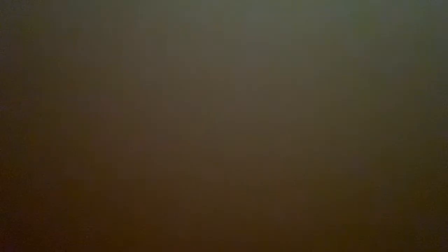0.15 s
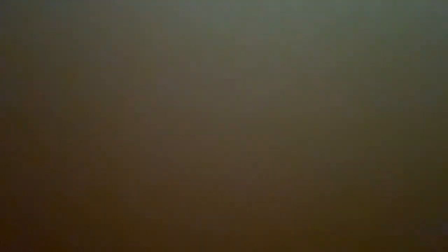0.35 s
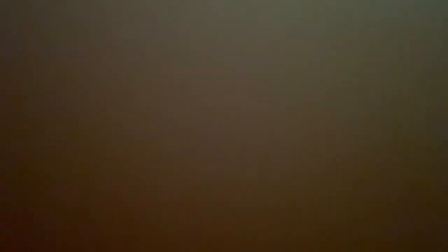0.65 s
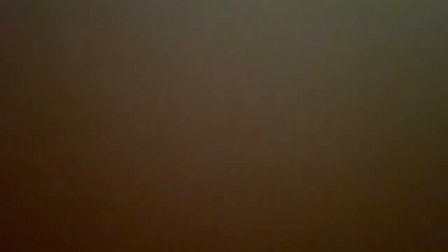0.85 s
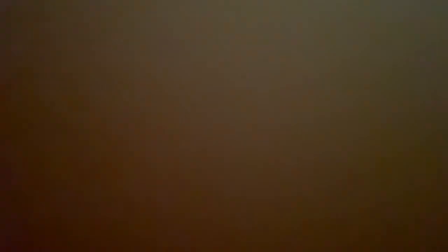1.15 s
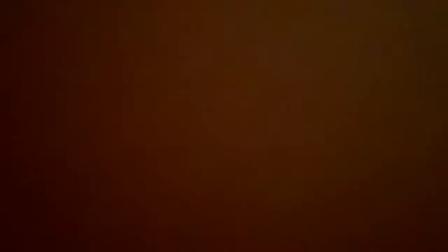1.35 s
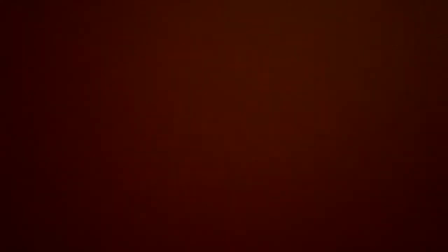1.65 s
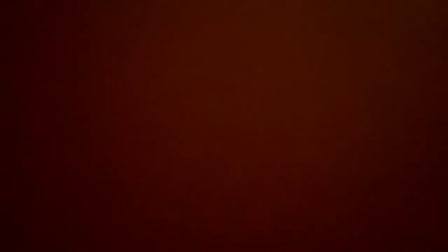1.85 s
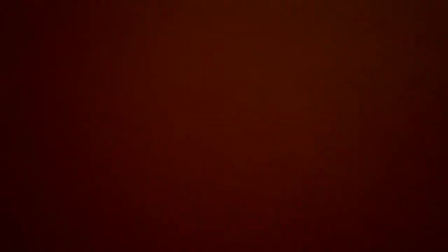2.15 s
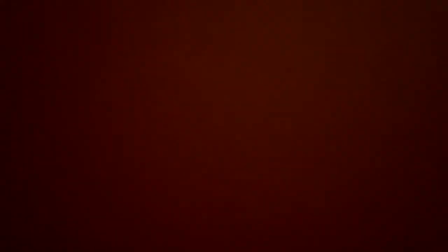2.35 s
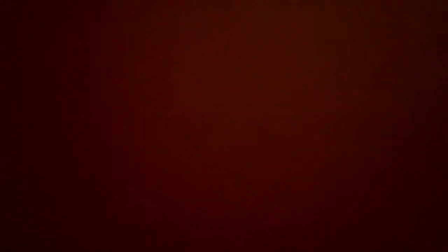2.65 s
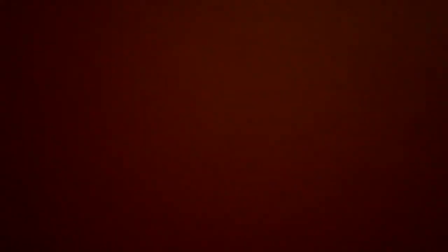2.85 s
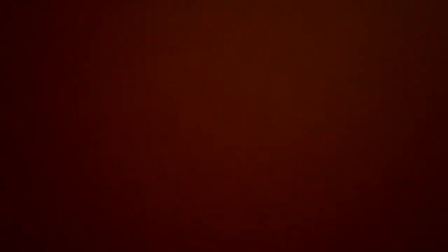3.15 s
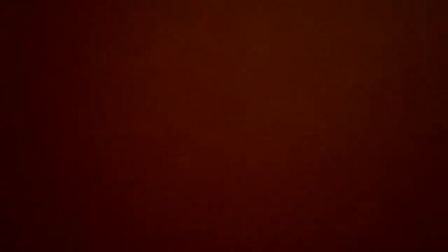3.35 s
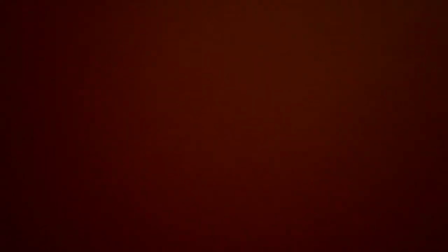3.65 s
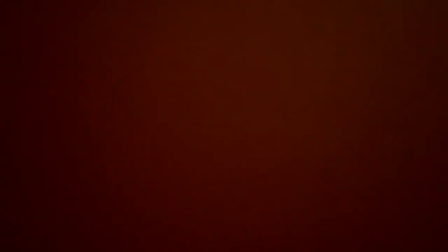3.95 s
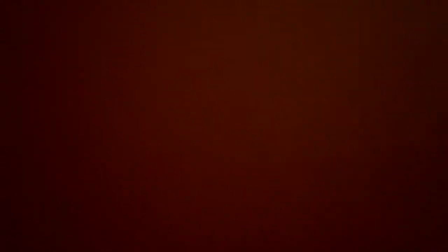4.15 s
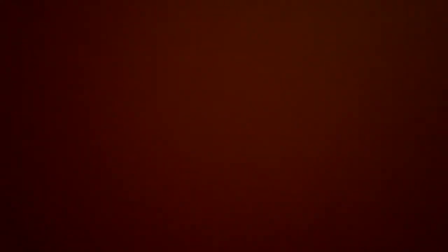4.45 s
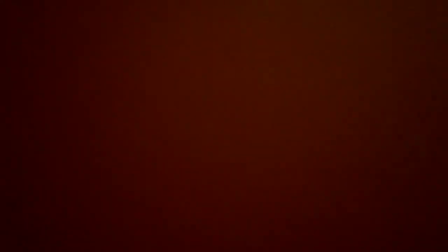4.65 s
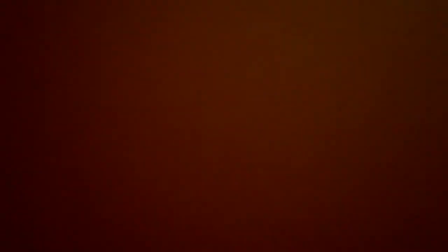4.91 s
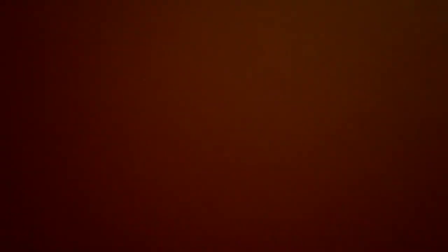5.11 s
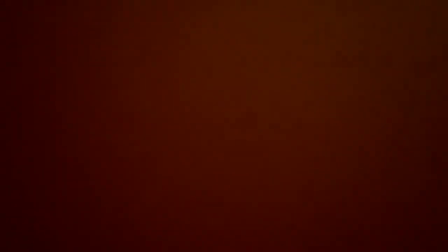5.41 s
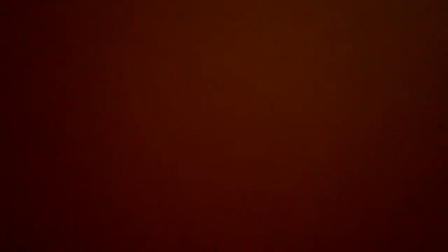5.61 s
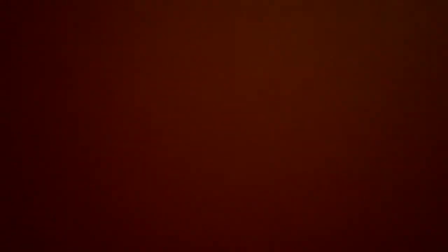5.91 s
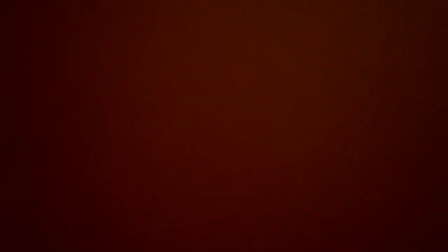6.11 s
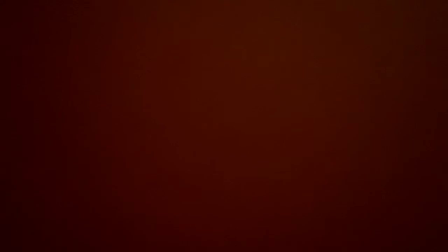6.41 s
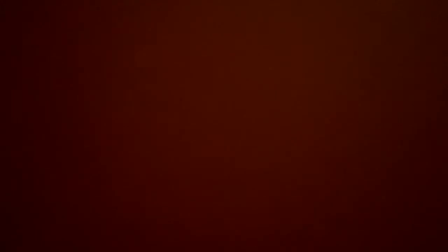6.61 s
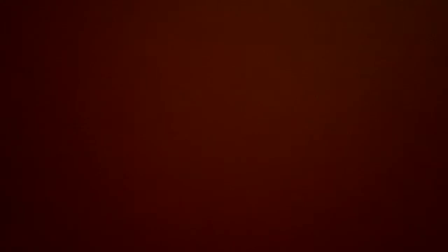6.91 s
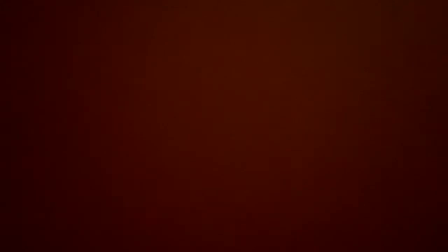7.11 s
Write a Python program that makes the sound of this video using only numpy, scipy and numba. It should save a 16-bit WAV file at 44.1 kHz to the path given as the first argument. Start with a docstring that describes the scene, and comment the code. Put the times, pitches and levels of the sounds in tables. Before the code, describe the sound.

Plastic toy bricks rattle and clack as they drop into a hollow bin, with dull thuds, loose settling pieces and brief pauses.

```python
"""Plastic bricks dropped into a bin

Handfuls of hollow plastic bricks are scooped up and dropped into a plastic bin; a phone lies right beside it.
Each knock is a quick burst of tiny contacts that makes the hollow brick ring and its edges tick.
Landings thump the floor and wall of the bin, and small pieces rattle and settle in between.
The bin and a small furnished room add short echoes over a faint, steady room tone.
"""
import sys
import numpy as np
from scipy import signal
from scipy.fft import rfft, irfft, next_fast_len
from scipy.io import wavfile
from numba import njit

SR = 44100
rng = np.random.default_rng(int(sys.argv[2]) if len(sys.argv) > 2 else 0)


def persist_wave(psi):
    """Save psi, clipped to +-1, as 16-bit WAV."""
    counts = np.round(np.clip(psi, -1, 1) * 32767).astype(np.int16)
    wavfile.write(sys.argv[1], SR, np.atleast_2d(counts).T)


N = 320607
CORNERS = 4  # corners of the bin where a blow can land

# Brick knocks: (time [s], peak level [dB], brick pitch [Hz], edge tick above the peak [dB], contact [ms])
KNOCK_EVENTS = [(0.023, -18.5, 2260, 9.5, 7.1), (0.038, -22, 2270, -12.5, 6), (0.06, -17.5, 2550, 6, 1.1),
                (0.0903, -20, 3000, 3, 2.4), (0.1084, -19.5, 2500, 0, 1.6), (0.1385, -23, 2400, -13, 5.5),
                (0.191, -17, 2300, -19, 2.7), (0.1978, -18.5, 2740, 2, 2.2), (0.242, -14.5, 2200, 13, 7.8),
                (0.271, -18.5, 2380, 8, 2.6), (0.328, -17, 2600, 5, 6.6), (0.3649, -22.5, 3090, 11, 4),
                (0.421, -28.5, 2420, -13.5, 5.7), (0.895, -34.5, 2100, 8, 3.2),
                (0.925, -28, 2860, -16, 1.7), (0.966, -17.5, 3030, -3, 2.3), (0.974, -15, 2240, -2.5, 10),
                (1.0171, -14.5, 1700, -2, 1.1), (1.091, -14.5, 2580, -5, 8.6),
                (1.105, -13.5, 2200, -12, 8.5), (1.118, -17, 2130, -13, 8.7),
                (1.186, -10.5, 2090, -22, 6.7), (1.185, -10.5, 5400, -26, 2.1),
                (1.2402, -20.5, 1370, -31, 1.2), (1.277, -20, 2040, -17.5, 15),
                (1.324, -15.5, 1620, -15, 1.3), (1.444, -25, 2200, -12, 3.5),
                (1.4771, -22.5, 3240, -25, 1.7), (1.5268, -11.5, 2070, -7, 2.9),
                (1.599, -19.5, 2000, -15, 1.6), (1.6776, -20, 3040, -2.5, 15),
                (1.6918, -19, 2700, -22.5, 1.1), (1.702, -26, 2280, -15, 1.7),
                (1.7286, -11, 1740, -20, 4.1), (1.737, -14, 1770, -21, 0.5), (1.738, -16.5, 3180, -21, 4.4),
                (1.7733, -24.5, 2950, 3.5, 1.1), (1.7883, -21, 1800, 1, 2.5), (1.851, -25, 5140, -3, 1.5),
                (1.8686, -7, 2340, -27, 1.3), (1.885, -14.5, 2480, -12, 1.5),
                (1.8941, -15, 1890, 0.5, 0.96), (1.9211, -18, 3070, -11, 0.95),
                (1.957, -29.5, 3960, 0.5, 1.9), (2.0063, -20, 2140, 4, 1.0), (2.013, -21.5, 4400, -3, 0.93),
                (2.033, -24.5, 1900, 0, 1), (2.049, -25, 1930, -5, 1.6), (2.07, -27.5, 1710, -10, 1.5),
                (2.1443, -10, 2550, -1, 2.5), (2.147, -14, 1540, -16, 3.4), (2.178, -10.5, 2740, -17.5, 6),
                (2.1828, -12.5, 2720, -0.5, 4.5), (2.195, -11.5, 5420, -3, 4.9), (2.24, -6.5, 2410, -7, 2),
                (2.32, -21, 3370, -6, 5.1), (2.3407, -23.5, 2010, -23.5, 3.6), (2.352, -24.5, 5350, -7, 13),
                (2.3787, -24.5, 2460, -8, 5.3), (2.41, -29, 5510, -9, 12), (2.4446, -25, 5650, -15, 7.2),
                (2.5016, -23.5, 2520, 2, 8.6), (2.5458, -20, 2410, -29, 11), (2.723, -33.5, 2450, -4, 5.6),
                (2.8486, -19.5, 1430, -7, 2.14), (2.8908, -14, 2420, -11, 2),
                (2.9978, -6.5, 2535, -3.5, 5.9), (3.0115, -21.5, 2720, 4, 1.2), (3.044, -25, 1930, 12, 3),
                (3.0604, -12, 3200, -0.5, 1.9), (3.085, -19, 2170, -13.5, 2.8),
                (3.12, -13.5, 1910, -12, 3.2), (3.1517, -15.5, 1510, -2, 1.8), (3.193, -24.5, 2270, 3, 1.5),
                (3.2229, -25, 2160, -2, 1.3), (3.2586, -28, 2090, -6, 1.2), (3.2926, -15, 5100, 1, 2.8),
                (3.3061, -13.5, 4970, 5, 4.4), (3.3198, -20, 4930, -21.5, 1.7),
                (3.3775, -5.5, 1650, 1.5, 5.5), (3.442, -11.5, 2600, -10, 9.7),
                (3.4507, -15.5, 2830, -7.5, 9.8), (3.485, -15.5, 2080, -12.5, 0.97),
                (3.5115, -23, 2850, 3, 2.7), (3.531, -18, 2950, -8, 1.3), (3.5797, -22, 2980, -1.5, 1.2),
                (3.6303, -17.5, 2780, -5, 12), (3.6494, -11.5, 1760, -1, 7.8),
                (3.702, -26.5, 4540, -15, 1.4), (3.7491, -21, 3420, -23, 9.4),
                (3.764, -11.5, 3223, -1, 4.2), (3.7956, -24, 2900, -17, 2.5), (3.8244, -22, 2700, -25, 1.4),
                (3.972, -33, 1910, -13, 10), (3.9978, -36.5, 2860, -6, 1.1), (4.077, -5.5, 1770, -2, 1.8),
                (4.115, -17, 2230, 3.5, 3.8), (4.123, -14.5, 2310, -14, 3.3),
                (4.1425, -14.5, 2690, 10, 5.3), (4.157, -14, 2286, -11.5, 4.7), (4.232, -23, 3230, -5, 1.8),
                (4.265, -27.5, 2830, -15, 3.6), (4.339, -28, 5630, 4.5, 1.6), (4.369, -31, 1400, -4, 10),
                (4.419, -38, 1885, -22, 3), (4.5766, -16.5, 1580, -11, 1), (4.5938, -19, 2850, 1, 2),
                (4.7194, -12, 1830, -29.5, 0.15), (4.732, -23.5, 2570, -20, 1.2),
                (4.7582, -10.5, 2120, -19, 1.5), (4.866, -31.5, 1840, -23, 6.1),
                (4.934, -11.5, 1924, -9, 2.4), (4.939, -16, 1801, -24, 5.9), (5.382, -11.5, 2920, 2.5, 11),
                (5.449, -23, 2380, -11.5, 4.4), (5.516, -22, 3820, 8, 5.9), (5.529, -23, 3800, 6, 7.1),
                (5.6053, -21.5, 1940, 2, 9.4), (5.712, -27, 3120, -23, 1.7),
                (5.7195, -11.5, 2950, -33, 2.8), (5.759, -18, 1920, -27, 3.9),
                (5.7969, -19, 2130, -1, 2.34), (5.8242, -27, 1580, -5, 2.3), (5.942, -20.5, 1610, 1, 2.5),
                (5.9757, -6.5, 1680, -1, 0.87), (5.977, -11.5, 4510, -21, 4.9),
                (6.004, -20, 2970, -9.5, 4.9), (6.002, -17, 6070, -7, 5), (6.023, -13.5, 1580, -5, 1.6),
                (6.0355, -15, 2910, -2, 0.91), (6.0937, -8.5, 1680, -8, 0.94), (6.1055, -7, 3030, -16, 1.4),
                (6.118, -14, 3200, -16, 2.2), (6.1373, -16.5, 2470, -24, 0.38),
                (6.149, -18.5, 1540, -12, 1.8), (6.158, -19, 2820, -18, 0.877),
                (6.1961, -25.5, 1205, 0.5, 1), (6.2875, -18, 4360, -10, 0.595),
                (6.397, -13.5, 2530, -3, 1.4), (6.4047, -11, 2360, 0.5, 2.8), (6.446, -13, 1520, -4.5, 2.7),
                (6.4639, -5.5, 3500, -9, 0.6), (6.48, -14, 4600, -5, 0.52), (6.503, -19.5, 2840, -8, 3.4),
                (6.5614, -13.5, 4020, -2.5, 0.36), (6.587, -17, 2840, -13, 0.62),
                (6.5997, -27.5, 2480, -4, 0.53), (6.619, -22.5, 3050, -23, 0.5),
                (6.645, -25.5, 3800, -24.5, 0.29), (6.7229, -30, 3250, -2, 3.2),
                (6.758, -10, 2920, -5, 0.97), (6.7698, -16, 3780, -6.5, 0.57), (6.851, -24.5, 3330, 8, 2.3)]
# Ringing of a hollow brick: (multiple of pitch [ratio], relative level [dB], unscaled 60 dB ring time [s])
BRICK_MODES = [(1, -2.5, 0.02), (.7, -0.5, 0.0027), (1.35, -3, 0.0034), (1.8, -11, 0.0056),
               (2.3, -15.5, 0.0067), (1.05, 2, 0.0018)]
# Ringing of the stiff edges: (unscaled frequency [Hz], relative level [dB], unscaled 60 dB ring time [s])
EDGE_MODES = [(6600, -8.5, 0.0017), (7260, -4.5, 0.0017), (9340, -3.5, 0.0028), (11950, -4.5, 0.0055),
              (13700, -1, 0.0055)]


def knocks():
    """The hollow brick rings at its own pitch and its stiff edges tick."""
    time_s, peak_db, pitch_hz, edge_db, contact_ms = np.transpose(KNOCK_EVENTS)
    contact_s = np.clip(contact_ms, 0.1, 12) / 1000
    # a glancing tick dies at once, a full knock lets the hollow ring on, small bricks less
    fullness = np.clip(0.63 + 0.25 * contact_ms, 0.2, 1.1)
    ring = (fullness * np.minimum(4200 / pitch_hz, 1))[:, None]
    body = blows(time_s, peak_db, contact_s, BRICK_MODES, pitch=pitch_hz, ring=ring,
                 detune=0.02, uneven_db=2.5)
    edges = blows(time_s, peak_db + edge_db, contact_s, EDGE_MODES, detune=0.1)
    return body + edges


# Landings: (time [s], bin floor peak level [dB], floor pitch [Hz], bin wall peak level [dB])
THUMP_EVENTS = [(0.09, -13.5, 261, -16), (0.107, -13.5, 243, -22), (0.15, -12, 271, -14.5),
                (0.175, -16, 240, -13), (0.2, -14.5, 231.1, -11.5), (0.256, -16, 167, -32.5),
                (0.53, -31, 233.7, -33), (0.897, -23.5, 224.5, -23), (0.969, -18, 229.2, -20),
                (0.988, -9, 230.4, -21.5), (1.031, -21, 221.2, -35.5), (1.105, -15, 193.6, -34),
                (1.194, -10.5, 226.5, -23), (1.251, -26, 261, -49), (1.317, -15, 218, -47.5),
                (1.412, -28, 215.2, -45), (1.444, -25, 222, -40), (1.528, -7.5, 223, -14.5),
                (1.6, -12.5, 218.5, -39), (1.629, -20, 247.4, -38.5), (1.732, -37, 227, -27),
                (1.78, -20, 238, -26.5), (1.887, -16, 240.3, -23), (2.148, -24.5, 252, -38.5),
                (2.272, -3, 264.5, -12), (2.347, -12.5, 214.3, -28), (2.512, -18.5, 291, -16.5),
                (2.73, -32.5, 238, -32), (2.888, -41, 351, -27.5), (3.002, -18, 211, -47),
                (3.064, -14, 271.5, -16), (3.123, -22.5, 261, -19.5), (3.385, -28.5, 259, -15.5),
                (3.458, -18.5, 255, -12), (3.516, -20, 220, -25), (3.651, -7.5, 337, -31.5),
                (3.684, -15.5, 208, -47.5), (3.768, -17, 290, -25.5), (4.077, -26.5, 443, -25.5),
                (4.126, -17.5, 290.5, -34), (4.179, -4.5, 339, -14.5), (4.243, -26.5, 204.7, -39),
                (4.372, -25, 305.6, -21), (4.424, -27.5, 262, -26.5), (4.584, -12.5, 249.5, -14.5),
                (5.393, -32.5, 281, -11), (5.5, -15, 246.6, -21.5), (5.537, -19.5, 210, -28.5),
                (5.61, -22, 288, -25.5), (5.734, -32.5, 227, -30), (5.759, -17.5, 185.4, -18),
                (5.799, -13, 191, -18.5), (5.972, -4.5, 226, -24.5), (6.024, -9.5, 166.3, -32),
                (6.092, -15, 259, -12), (6.11, -10, 233, -23.5), (6.298, -34, 250, -31),
                (6.403, -15.5, 221.4, -37), (6.468, -16, 249.6, -20), (6.563, -28.5, 254, -22),
                (6.619, -24.5, 247, -34.5), (6.763, -16, 216, -38.5), (6.858, -23, 246, -30.5)]
# Ringing of the bin floor: (multiple of pitch [ratio], relative level [dB], unscaled 60 dB ring time [s])
FLOOR_MODES = [(.78, 3, 0.064), (.45, -14, 0.086), (.25, -14, 0.12), (1.05, -5, 0.043), (1.6, -7, 0.016)]
# Ringing of the bin wall: (unscaled frequency [Hz], relative level [dB], unscaled 60 dB ring time [s])
WALL_MODES = [(483, -10, 0.078), (620, 2, 0.012), (773, 1.5, 0.028), (928, 3.5, 0.039), (1120, -3.5, 0.01)]
SAG = 0.75  # a struck floor starts sharp by this share and sinks to its pitch


def thumps():
    """A brief push sets the bin floor swinging for a few cycles and knocks the wall."""
    time_s, floor_db, pitch_hz, wall_db = np.transpose(THUMP_EVENTS)
    floor = blows(time_s, floor_db, 0.0006, FLOOR_MODES, pitch=pitch_hz,
                  detune=0.04, uneven_db=2.5, gritty=False, sag=SAG)
    wall = blows(time_s, wall_db, 0.0022, WALL_MODES, detune=0.05, uneven_db=1.0)
    return floor + wall


# Slides of the heap: (start time [s], duration [s], rattle level [dB], edge tick level [dB], rumble level [dB])
SLIDE_EVENTS = [(-0.02, 0.23, -36.5, -40.5, -35), (0.198, 0.19, -38, -39.5, -39),
                (0.514, 0.047, -59.5, -70, -49.5), (0.899, 0.018, -53.5, -58.5, -45.5),
                (0.967, 0.063, -44, -55, -50.5), (1.081, 0.032, -44.5, -58, -44.5),
                (1.159, 0.089, -46, -62, -51), (1.275, 0.097, -55, -64, -48.5),
                (1.464, 0.23, -57.5, -77, -49.5), (1.715, 0.1, -51.5, -77, -47.5),
                (1.809, 0.17, -52, -60.5, -56), (1.94, 0.082, -51.5, -68, -44.5),
                (2.15, 0.05, -35, -49.5, -45.5), (2.202, 0.062, -32.5, -40, -34.5),
                (2.317, 0.11, -41.5, -49.5, -42.5), (2.442, 0.092, -44.5, -56, -42),
                (2.715, 0.12, -65.5, -74.5, -58.5), (2.88, 0.015, -57.5, -56, -70.5),
                (2.992, 0.011, -47, -55.5, -59), (3.067, 0.19, -51, -78, -51.5),
                (3.381, 0.0036, -35.5, -60.5, -35.5), (3.43, 0.11, -42.5, -56, -40),
                (3.612, 0.23, -52, -67.5, -48.5), (4.074, 0.047, -51.5, -56.5, -49.5),
                (4.126, 0.036, -30, -36.5, -34), (4.231, 0.039, -46.5, -49, -42.5),
                (4.316, 0.082, -58, -62.5, -47), (4.488, 0.097, -72.5, -82.5, -61.5),
                (4.579, 0.01, -44, -62, -47), (4.673, 0.11, -55, -63, -50), (4.849, 0.034, -61, -74, -50.5),
                (4.933, 0.013, -40.5, -49, -49), (5.394, 0.0079, -31, -35.5, -37),
                (5.445, 0.08, -45, -51.5, -44), (5.573, 0.11, -61, -72.5, -54),
                (5.713, 0.12, -50, -62.5, -48), (5.938, 0.071, -44.5, -48.5, -47),
                (6.106, 0.1, -53, -67.5, -49.5), (6.27, 0.033, -50.5, -79, -52),
                (6.392, 0.13, -50, -63, -51), (6.517, 0.092, -53, -81, -44.5),
                (6.727, 0.032, -50.5, -77, -50.5), (6.828, 0.1, -65, -70, -58),
                (6.975, 0.045, -64, -67, -71.5)]
RISE_DB_PER_S = 1491.5
SETTLE_DB_PER_S = 238.5, 330, 164  # rattle, ticks, rumble


def sliding():
    """Gains of rattle, ticks and rumble: each slide sets in fast, holds, then settles."""
    start, lasts, *levels = np.transpose(SLIDE_EVENTS)[..., None]
    t = np.arange(0, N, 32) / SR  # a coarse time grid, filled in below
    before = np.maximum(start - t, 0)
    after = np.maximum(t - start - np.abs(lasts), 0)
    gains = []
    for db, fall in zip(levels, SETTLE_DB_PER_S):
        slide_gain = undb(db - RISE_DB_PER_S * before - fall * after)
        total = np.sqrt(np.sum(slide_gain ** 2, axis=0))
        gains.append(np.interp(np.arange(N) / SR, t, total))
    return gains


def scatter(per_s, spread_db):
    """Random moments [s], levels [dB] with a few much bigger than the rest, and random shares from 0 to 1."""
    chance = rng.random((int(per_s * N / SR), 3))
    return chance[:, 0] * N / SR, -spread_db * np.log(1 - chance[:, 1]), chance[:, 2]


CLACK_DB = -4  # lone clacks against the fine rattle
RUMBLE_WALL_DB = -6  # wall below floor


def heap():
    """Small tumbling pieces: a fine rattle of random pitches, lone clacks, edge ticks, and a bin rumble."""
    rattle_gain, tick_gain, rumble_gain = sliding()

    time_s, db, share = scatter(600, spread_db=2.5)
    fine_rattle = blows(time_s, db, 0.0038, BRICK_MODES, pitch=1500 * 2.3 ** share, ring=1.7)
    fine_ticks = blows(time_s, db, 0.0019, EDGE_MODES, detune=0.048)

    time_s, db, share = scatter(130, spread_db=2.5)
    clacks = blows(time_s, db, 0.00072, BRICK_MODES, pitch=1400 * 2.4 ** share, ring=1.1)
    clack_ticks = blows(time_s, db, 0.00066, EDGE_MODES)
    rattle = level(fine_rattle, 0) + level(clacks, CLACK_DB)
    ticks = level(fine_ticks, 0) + level(clack_ticks, CLACK_DB)

    time_s, db, share = scatter(160, spread_db=2.0)
    floor = blows(time_s, db, 0.002, FLOOR_MODES, pitch=240 * 1.4 ** share, ring=0.87)
    wall = blows(time_s, db, 0.0015, WALL_MODES, detune=0.038)
    rumble = level(floor, 0) + level(wall, RUMBLE_WALL_DB)
    return rattle_gain * level(rattle, 0) + tick_gain * level(ticks, 0) + rumble_gain * rumble


def blows(time_s, db, contact_s, modes, pitch=0.95, ring=0.73, detune=0.082, uneven_db=3.0, gritty=True, sag=0.):
    """Blows on one body, one row per corner of the bin; the spot hit shifts and reweights the modes."""
    ratio, mode_db, t60 = np.transpose(modes)
    chance = rng.standard_normal((len(time_s), 2, len(ratio)))
    corner = rng.integers(0, CORNERS, len(time_s))
    one = np.ones((len(time_s), 1))
    # pitch and ring scale the frequencies and ring times of the modes
    hz = np.reshape(pitch, (-1, 1)) * ratio * np.exp(detune * chance[:, 0])
    hz = np.clip(hz, 20, 0.45 * SR)
    gain = undb(mode_db + uneven_db * chance[:, 1])
    start = np.clip((time_s * SR).astype(int), 0, N - 2)
    contact = contact_s * one[:, 0]
    rise = 0.001 + 0.37 * contact
    # spiky noise stands for many tiny contacts, a constant for one smooth push
    grit = rng.standard_normal(N) * rng.exponential(1, N) if gritty else np.ones(N)
    return strike(start, corner, undb(db), contact, rise, hz, gain, one * ring * t60, grit, sag,
                  np.zeros((CORNERS, N)))


SAG_S = 0.0089  # time constant of the sinking pitch


@njit
def strike(start, corner, peak, contact, rise, hz, gain, t60, grit, sag, out):
    """Each blow drives its modes with a push that sets in fast and fades, then is scaled to its peak."""
    for e in range(len(start)):
        n = min(int(SR * (6 * contact[e] + t60[e].max())), len(grit) - start[e])
        y = np.zeros(n)
        fade = np.exp(-1 / (contact[e] * SR))
        for m in range(hz.shape[1]):
            # each sample, a mode turns by its frequency and shrinks by its decay
            turn = np.exp(2j * np.pi * hz[e, m] / SR - np.log(1000) / (t60[e, m] * SR))
            z = 0j
            push = gain[e, m]
            sharp = sag * 2 * np.pi * hz[e, m] / SR  # extra turn while the pitch is sharp
            for i in range(n):
                onset = min((i + 1) / (rise[e] * SR), 1.)
                z = z * turn * (1 - sharp ** 2 / 2 + 1j * sharp) + onset * push * grit[start[e] + i]
                push *= fade
                sharp *= 1 - 1 / (SAG_S * SR)
                y[i] += z.imag
        out[corner[e], start[e]:start[e] + n] += y * peak[e] / (np.abs(y).max() + 1e-18)
    return out


# Phase between the two microphone ports: (frequency [Hz], lead of the left port [rad])
PORT_LEAD_CURVE = [(0, 1.6), (170, 0.8), (260, 1.5), (390, 2.4), (620, 3.3), (900, 1.8), (1380, 3.5),
                   (2330, 5.7), (4570, 10.9), (5430, 14.2), (7580, 13.3), (9730, 14.7), (12200, 18.6),
                   (16100, 22.2)]
# Balance between the two ports: (frequency [Hz], left minus right [dB])
PORT_BALANCE_CURVE = [(60, 4), (110, 1), (200, 3), (380, 2.5), (700, 2), (1290, 4.5), (2380, 4), (4400, 3),
                      (8120, 1.5), (15000, -1.5)]
# from the middle to the outermost corner: change of port phase, where it is most, change of balance
CORNER_RAD, CORNER_HZ, CORNER_DB = 1.1, 3800, 2.5


def ports(x):
    """Each corner of the bin reaches the two microphone ports by its own pair of paths."""
    size = next_fast_len(N)
    corner = np.linspace(-1, 1, len(x))[:, None]
    f = np.maximum(np.arange(size // 2 + 1) * SR / size, 1)
    corner_lead = CORNER_RAD * corner * np.exp(-np.log(f / CORNER_HZ) ** 2 / 0.48)
    lead = np.interp(f, *np.transpose(PORT_LEAD_CURVE)) + corner_lead
    hz, db = np.transpose(PORT_BALANCE_CURVE)
    balance_db = np.interp(np.log(f), np.log(hz), db) + CORNER_DB * corner
    half = np.sqrt(undb(balance_db))  # half the difference goes to each port
    paths = np.array([half, np.exp(-1j * lead) / half])
    return irfft(np.sum(rfft(x, size) * paths, axis=1), size)[:, :N]


def echoes(x, t60_s, db, gap_s):
    """A dense fading tail of noise, different from each corner to each port."""
    t = np.arange(int(1.3 * t60_s * SR)) / SR
    fade = np.exp(-np.log(1000) * t / t60_s) * np.minimum(t / gap_s, 1)
    tail = rng.standard_normal((len(x), 2, len(t))) * fade
    tail *= undb(db) / np.sqrt(np.sum(tail ** 2, axis=2, keepdims=True))
    return signal.fftconvolve(x[:, None], tail, axes=2).sum(axis=0)[:, :N]


# Colour of the faint room tone: (frequency [Hz], relative level [dB])
ROOM_TONE_COLOUR = [(18, -37), (30, -2), (102, -1.5), (564, -30.5), (5380, -37.5), (9820, -39.5),
                    (10600, -44.5), (12000, -43.5), (15600, -63), (22000, -120)]


def room_tone():
    """Steady noise at each port, mostly deep, for the nearly silent room."""
    return level(shape(rng.standard_normal((2, N)), ROOM_TONE_COLOUR), -65.5)


def undb(db):
    """Decibels to gain."""
    return 10 ** (np.asarray(db) / 20)


def level(x, db):
    """Scale x to an rms level."""
    return x * undb(db) / np.sqrt(np.mean(x ** 2))


def shape(x, table):
    """Colour x by (frequency [Hz], level [dB]) points."""
    hz, db = np.transpose(table)
    size = next_fast_len(x.shape[-1])
    f = np.maximum(np.arange(size // 2 + 1) * SR / size, 1)
    gain = undb(np.interp(np.log(f), np.log(hz), db))
    return irfft(rfft(x, size) * gain, size)[..., :x.shape[-1]]


# Overall colour: (frequency [Hz], level [dB])
OVERALL_COLOUR = [(25, -35.5), (45, -7.5), (100, -2), (500, 8), (1300, 3.5), (2500, 2.5), (4000, 5.5),
                  (8000, 3), (9500, 2.5), (10500, -11.5), (11500, -4.5), (13500, -6), (15000, -12),
                  (16500, -25.5)]


def scene():
    """Bricks and bin at both ports, with the echoes of bin and room over a faint room tone."""
    dry = knocks() + thumps() + heap()
    bass = signal.sosfilt(signal.butter(2, 400, fs=SR, output="sos"), dry)
    # the bin walls throw the middle range about, so the two ports hear it unlike
    middle = signal.sosfilt(signal.butter(1, [1100, 7000], "bandpass", fs=SR, output="sos"), dry)
    inside_bin = echoes(middle, t60_s=0.022, db=-2, gap_s=0.0007)
    # soft furnishings soak up the treble sooner than the bass; long waves reach both ports much alike
    shared, apart = echoes(bass, t60_s=0.3, db=-13, gap_s=0.012)
    room = echoes(dry - bass, t60_s=0.21, db=-9.5, gap_s=0.0013)
    room += undb(-5.5) * apart * np.array([[1], [-1]])  # opposite signs at the two ports
    direct = ports(dry + shared / CORNERS)
    return shape(direct + inside_bin + room, OVERALL_COLOUR) + room_tone()


def record(dry):
    """The phone rounds the loudest peaks and cuts the top above 16500 Hz."""
    rounded = 0.92 * np.tanh(1.015 * dry)
    return signal.sosfilt(signal.ellip(8, 0.2, 70, 16500, fs=SR, output="sos"), rounded)


dry = scene()
out = record(dry)
persist_wave(out)
```